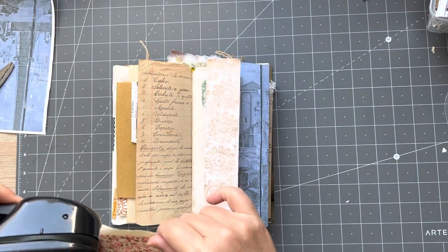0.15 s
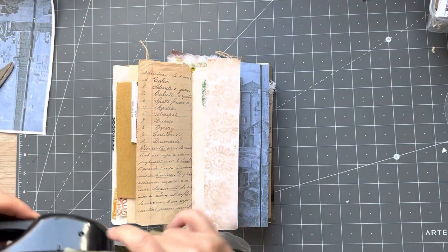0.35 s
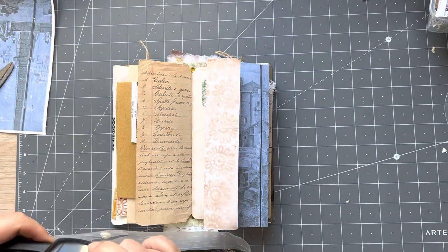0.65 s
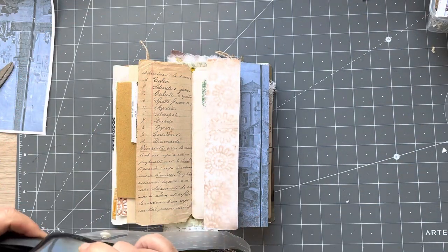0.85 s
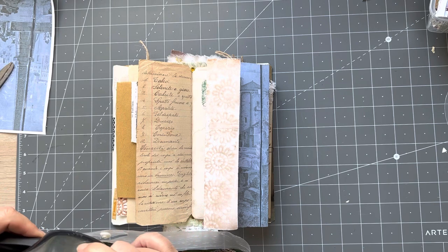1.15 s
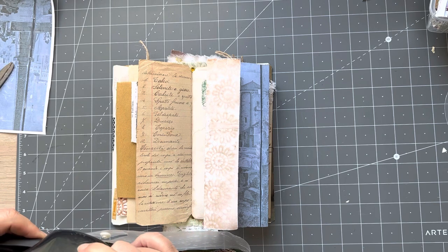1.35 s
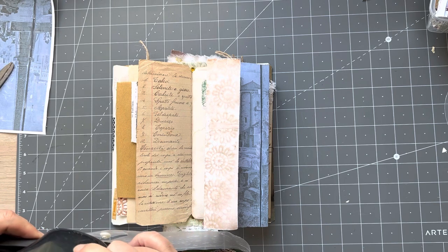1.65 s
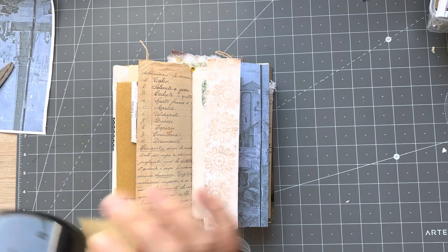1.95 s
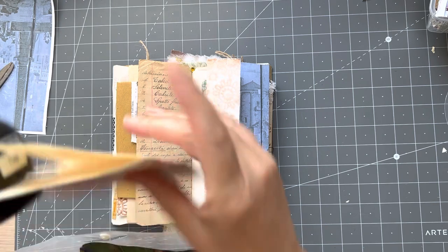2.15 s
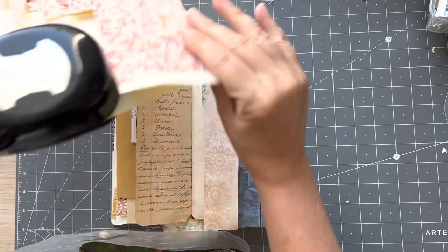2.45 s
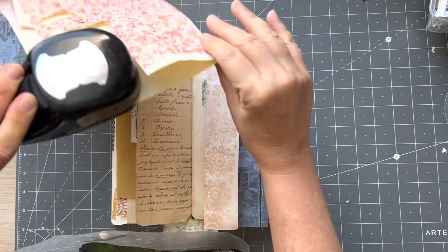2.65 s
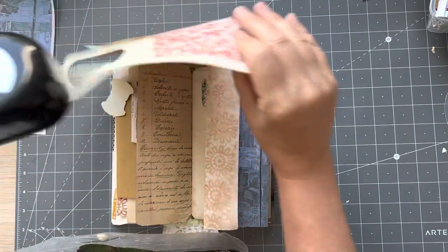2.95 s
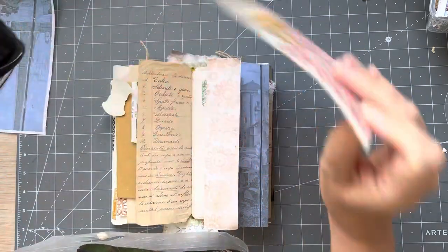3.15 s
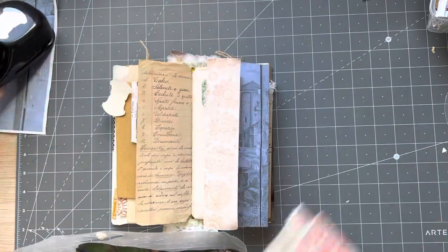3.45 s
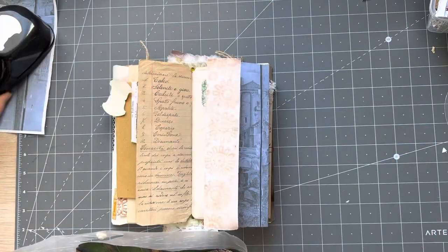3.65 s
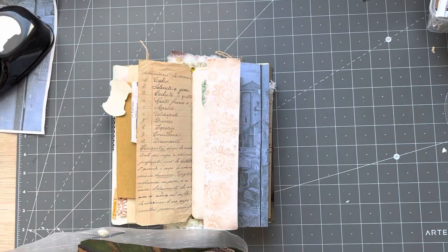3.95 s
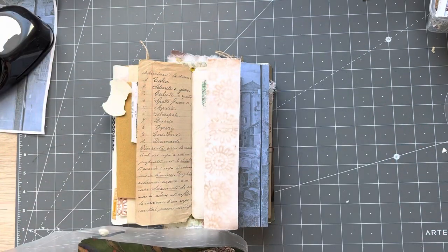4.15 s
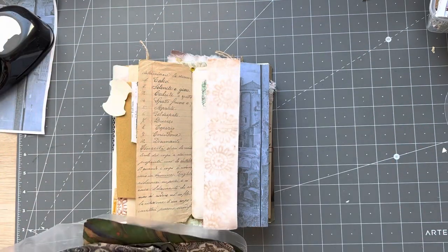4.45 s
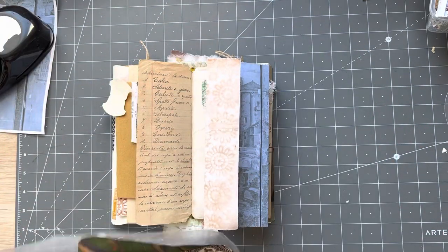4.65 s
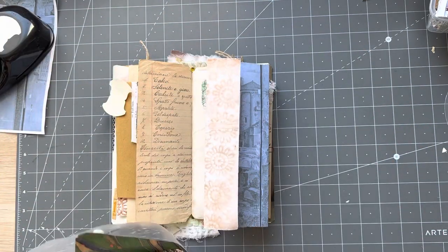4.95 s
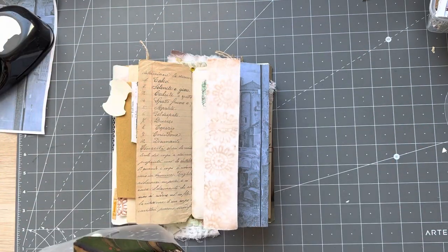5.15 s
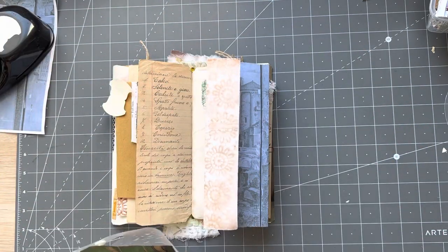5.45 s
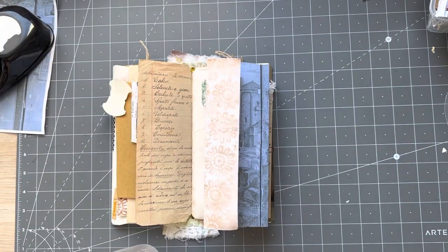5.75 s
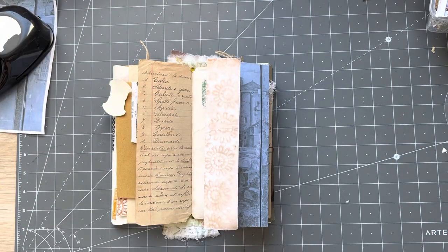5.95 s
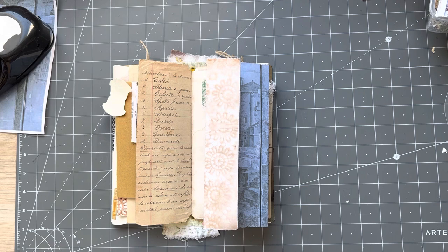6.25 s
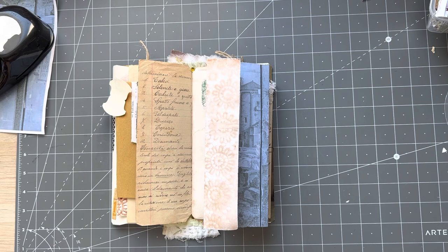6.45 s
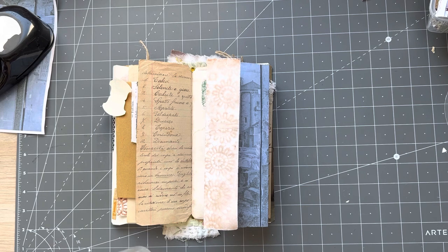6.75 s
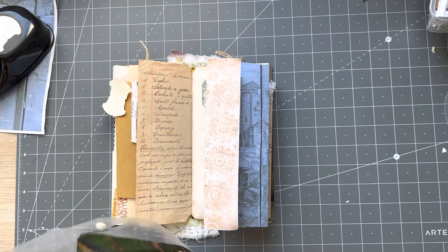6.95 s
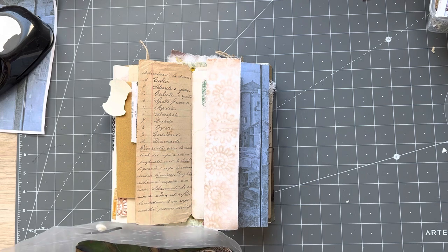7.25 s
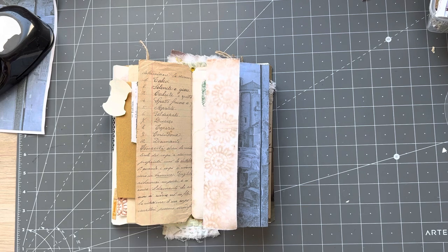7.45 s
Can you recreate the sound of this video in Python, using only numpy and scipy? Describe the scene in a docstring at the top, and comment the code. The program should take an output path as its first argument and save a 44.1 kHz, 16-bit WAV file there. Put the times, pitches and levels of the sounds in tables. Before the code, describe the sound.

Close stereo recording at a craft table in a small, fairly dry room. Paper slides softly with small snaps, then a lever punch bites card in a quick run of hard clicks. The sheet is pulled free with crisp cracks, the punch lands with a heavy low clunk and a few lighter knocks, and a hand rummages through rustling scraps, faintly bumping something hollow.

```python
"""Paper craft at a table in a small room, over a low rumble of filtered noise.
Card slides into a lever punch (coloured stick-slip noise); the die bites in jerks (bursts ringing its modes).
The sheet is pulled free with snaps (bursts of tiny cracks). Thin scraps begin to rustle; the punch is put
down with a heavy clunk and two knocks (struck modes plus rattle). A hand rummages on through the scraps,
bumping a small hollow container (short decaying notes); stiff card slides again at the end."""
import sys
import numpy as np
from scipy import signal
from scipy.fft import rfft, irfft, next_fast_len
from scipy.io import wavfile

SR = 44100
rng = np.random.default_rng(int(sys.argv[2]) if len(sys.argv) > 2 else 0)


def wrap_up_sound(samples):
    """Save the sound to the file named by the first command line argument, as 16-bit audio."""
    columns = np.atleast_2d(samples).T
    # keep every value between -1 and 1, then stretch to whole-number steps
    tamed = np.clip(columns, -1, 1)
    steps = np.round(tamed * 32767).astype(np.int16)
    wavfile.write(sys.argv[1], SR, steps)


N = 334719
TIME = np.arange(N) / SR

# Table levels are relative; each source adds its own trims.
# hand strokes on paper: [start t/s, length/s, rubbing hiss level/dB, sheet flutter level/dB]
STROKES = [(-0.05, 0.017, -41, -33.5), (.22, 0.28, -49, -53.5), (.42, 0.091, -68, -51.5),
           (.665, 0.073, -60.5, -57.5), (1.69, 0.14, -56, -60), (1.85, 0.14, -48, -59.5),
           (1.96, 0.039, -62, -50), (2.05, 0.02, -52, -44), (2.13, 0.37, -50, -57.5),
           (2.58, 0.11, -48, -54), (2.71, .1, -41.5, -49.5), (2.79, 0.087, -36, -48.5),
           (3.545, 0.029, -58.5, -75), (3.96, 0.14, -54.5, -63), (4.245, 0.041, -61, -56.5),
           (4.46, 0.33, -51.5, -66), (4.59, 0.13, -50, -44), (4.74, .15, -67.5, -52.5),
           (5.07, .21, -51.5, -48), (5.3, 0.069, -71, -56), (5.55, 0.097, -49.5, -72),
           (5.78, .15, -47.5, -44.5), (6.05, 0.1, -50.5, -49.5), (6.28, 0.12, -67, -51),
           (6.49, 0.06, -48.5, -59), (6.605, 0.1, -46.5, -50.5), (6.86, 0.14, -54, -47),
           (7.25, 0.14, -48, -41), (7.45, .14, -52, -60)]
# light brushing between strokes: [start t/s, length/s, hiss level/dB, flutter level/dB]
BRUSHES = [(.08, 0.78, -72, -66.5), (1.12, 0.14, -85.5, -74), (1.57, 2.4, -71, -71), (4.3, 2.68, -60, -63),
           (7.16, 0.46, -63.5, -61.5)]
# clear snaps of buckling paper: [t/s, level/dB, brightness/dB, nominal fade/s]
SNAPS = [(.572, -45, -39, 0.0097), (1.666, -31.5, 2, 0.0048), (1.715, -31, -2, 0.0065),
         (1.744, -28.5, 0.5, 0.0045), (2.146, -32, 8, .005), (2.096, -36, -39, 0.014),
         (2.236, -33, -39, 0.0077), (2.603, -28, 4.5, 0.0018), (2.708, -26.5, -5, 0.0058),
         (2.724, -27, -8, 0.0096), (2.809, -20.5, 0.5, 0.0055), (3.487, -37, -8, 0.009),
         (3.98, -39.5, 2.5, .01), (4.035, -29.5, 3.5, 0.0033), (4.044, -25.5, -15, 0.0097),
         (4.253, -44.5, 1, 0.0093), (4.591, -30, 3, 0.0043), (4.643, -28.5, -3.5, 0.0059),
         (5.085, -37, -7, .012), (5.158, -33.5, 0.5, 0.033), (5.227, -30, 3, 0.0026),
         (5.257, -20, -2, 0.0056), (5.564, -35.5, -23, 0.0041), (5.795, -32.5, -6, 0.019),
         (6.267, -29, -9.5, 0.0049), (6.492, -32.5, 9.5, 0.0024), (6.865, -35, -0.5, 0.0063),
         (7.462, -31.5, -4.5, 0.005), (7.515, -32.5, -16, 0.019), (7.546, -30, 3.5, .002)]
# card catching on the die: [t/s, level/dB, scrape re level/dB, nominal fade/s, strongest ring f/Hz]
CATCHES = [(2.314, -11.5, -14.5, 0.00062, 1900), (2.336, -20, -15.5, 0.0032, 1300),
           (2.3455, -28, -3, 0.002, 1500), (2.366, -14, -15.5, 0.0047, 1000),
           (2.398, -24, -4, 0.0068, 1000), (2.432, -11, -11, 0.0058, 1550)]
# punch meets table: [t/s, table thud level/dB, shell knock level/dB, rattle level/dB, struck part f/Hz]
KNOCKS = [(3.3809, -4, -16.5, -24, 740), (3.635, -33.5, -34, -46, 880), (3.6492, -26, -39, -25.5, 1700),
          (3.659, -18.5, -23.5, -37.5, 1500), (3.748, -26, -21, -32.5, 1366)]
# bumps on the hollow container: [t/s, level/dB, lowest mode f/Hz]
BUMPS = [(4.699, -34.5, 488), (4.9, -40.5, 420), (5.391, -38, 354), (5.527, -32.5, 432), (5.615, -22, 424),
         (5.934, -35, 456), (6.124, -37.5, 481), (6.387, -31.5, 432), (6.451, -36.5, 490)]

# modes of table top, punch shell, free die, free container: [f/Hz, level/dB, t60/s]
TABLE_MODES = [(81, -11, 0.17), (105.6, -30.5, .06), (115, -1, 0.13), (211, -8.5, 0.12),
               (263.4, -7.5, 0.13)]
SHELL_MODES = [(394, -19.5, 0.029), (621, 7.5, 0.019), (753, -0.5, 0.077), (842, 7, 0.016),
               (1030, -2, 0.051), (1250, 5.5, 0.012), (1510, 2, 0.01), (1820, -0.5, 0.018),
               (2150, 1, 0.016)]
DIE_MODES = [(990, 2, 0.015), (1083, 0.5, 0.014), (1537, -4.5, 0.053), (1650, -5, 0.013), (2230, -4, 0.014),
             (2330, -6, 0.031), (2710, -22, 0.027), (3930, -20, .015), (5440, -3, 0.009), (5590, -2, 0.013)]
CONTAINER_MODES = [(413, -3, 0.6), (488, -4, 0.068), (590, -25, 0.054), (836, -18, 0.05), (1387, -14, 0.34)]

# spectra of sliding card, sliding scraps, sheet flutter, snaps, lever rattle, room rumble: [f/Hz, level/dB]
CARD_HISS_SPECTRUM = [(500, -30), (950, -2), (1900, -0.5), (2700, -3.5), (5000, -1.5), (8500, -1.5),
                      (10500, -11.5), (12400, -0.5), (14000, -18.5), (16000, -4.5)]
SCRAP_HISS_SPECTRUM = [(500, -21), (1000, -9), (1900, -6.5), (3300, -0.5), (5000, -1), (8500, 2),
                       (10500, -10), (12400, 3.5), (14000, -8.5), (16000, -8.5)]
FLUTTER_SPECTRUM = [(60, -7), (130, 3.5), (300, -3), (600, -8), (950, -7.5), (1600, -3.5), (2400, -7.5),
                    (5000, -39.5)]
SNAP_SPECTRUM = [(100, -9.5), (300, -5.5), (900, 6.5), (1600, 6), (2300, 1.5), (3500, 3), (6000, -4),
                 (9000, -2.5), (16000, -11.5)]
RATTLE_SPECTRUM = [(200, 15.5), (800, 5), (2000, -1.5), (3500, -5.5), (6000, -12), (9000, -15),
                   (12500, -20.5), (16000, -37.5)]
RUMBLE_SPECTRUM = [(25, -36), (55, 2), (100, -11), (200, -14.5), (350, -25.5), (750, -41), (2000, -40),
                   (3500, -48.5), (12000, -54.5), (16000, -66.5)]

# level between the microphone ports: [f/Hz, left minus right/dB]
PORT_BALANCE = [(150, .2), (500, 2.4), (1500, 1.8), (2800, -1), (4000, -1), (5300, -4), (7200, -1.5),
                (9000, 0)]
# phase between the ports, opposite in two treble bands: [f/Hz, left lead/rad]
PORT_PHASE = [(100, 0), (1600, .3), (3200, -.6), (6600, -.5), (7700, -1.3), (9000, .2), (10000, 2.8),
              (10900, 3.4), (11700, 6.1), (12600, 6.5), (13300, 9.1), (14300, 9.6), (15100, 12.4)]

RUMMAGE_START_S, RUMMAGE_END_S = 3.1, 7.2  # thin scraps inside this span, stiff card outside
STROKE_ATTACK_S, STROKE_ATTACK_SHARE, STROKE_SAG_DB_PER_S = 0.017, 0.23, 10  # share of stroke length adds to attack
BRUSH_ATTACK_S = 0.13
HISS_RELEASE_DB_PER_S, FLUTTER_RELEASE_DB_PER_S = 201, 166
BODY_LOSS_PER_BRIGHTNESS = 0.083  # dB/dB; bright snaps come from small facets and carry less body
SMALL_SNAP_DB, SMALL_SNAP_SPREAD_DB = 11.5, 6.5  # re paper motion; +- spread
SMALL_SNAP_FADE_S = 0.0038
CARD_DAMPING_T60_S = 0.018  # added decay of die modes pressed by card
BUMP_T60_S = 0.093  # lowest container mode, damped by the hand
CUTOFF_HZ = 15900


def rubbing(crackle_db=-7.5, flutter_db=-3.5, crinkle_db=-4.0, hollow_db=-8.5, jostle_db=1.0, shake_db=-8.5,
            card_uneven_db=1.5, scrap_uneven_db=3.0, slip_uneven_db=4.5):
    """Sliding paper hisses and crinkles; stick-slip shakes the sheet and whatever it lies in."""
    hiss_level, flutter_level = stroke_levels()
    rummaging = (TIME > RUMMAGE_START_S) & (TIME < RUMMAGE_END_S)
    grip = drift(15)
    crackle = amp(crackle_db) * grains(per_s=780, spread_db=0.5)
    friction = (rng.standard_normal(N) + crackle) * hiss_level

    # stiff card glides evenly with a low voice; thin scraps snag and let go
    card = colour(friction * ~rummaging * amp(card_uneven_db * grip), CARD_HISS_SPECTRUM)
    scraps = colour(friction * rummaging * amp(scrap_uneven_db * grip), SCRAP_HISS_SPECTRUM)

    slips = grains(per_s=2200, spread_db=2.5) * amp(slip_uneven_db * grip)
    flutter = colour(slips * flutter_level * amp(flutter_db), FLUTTER_SPECTRUM)
    ticks = crinkles(per_s=260, low_hz=846, high_hz=3600, cycles=6.1)
    ticks = ticks * np.sqrt(hiss_level * flutter_level) * amp(crinkle_db)

    # rummaging jostles larger pieces and stirs container and table
    jostle = crinkles(per_s=150, low_hz=369, high_hz=1150, cycles=11.3)
    nudges = grains(per_s=140, spread_db=1.0)
    # the hand halves the ring
    hollow = rms_one(sum(amp(db) * ring(nudges, hz, t60 / 2) for hz, db, t60 in CONTAINER_MODES))
    shake = rms_one(band(slips, [50, 120], "band"))
    stirred = amp(jostle_db) * jostle + amp(hollow_db) * hollow + amp(shake_db) * shake
    return card + scraps + flutter + ticks + stirred * (TIME > RUMMAGE_START_S) * flutter_level


def stroke_levels():
    """Hiss and flutter gains of moving paper; overlapping movements add in power."""
    hiss_power, flutter_power = 0, 0
    for moves, attack_s, share, sag in (
            (STROKES, STROKE_ATTACK_S, STROKE_ATTACK_SHARE, STROKE_SAG_DB_PER_S),
            (BRUSHES, BRUSH_ATTACK_S, 0, 0)):
        for start_s, length_s, hiss_db, flutter_db in moves:
            shape = start_s, length_s, attack_s + share * length_s, sag
            hiss_power += (amp(hiss_db) * swell(*shape, HISS_RELEASE_DB_PER_S)) ** 2
            flutter_power += (amp(flutter_db) * swell(*shape, FLUTTER_RELEASE_DB_PER_S)) ** 2
    return [np.interp(TIME, TIME[::32], np.sqrt(power)) for power in (hiss_power, flutter_power)]


def swell(start_s, length_s, attack_s, sag_db_per_s, release_db_per_s):
    """Gain of one movement, every 32nd sample: eased attack, sagging hold, release."""
    age_s = np.maximum(TIME[::32] - start_s, 0)
    attack = np.sin(np.pi / 2 * np.minimum(age_s / attack_s, 1)) ** 2
    return attack * amp(-sag_db_per_s * age_s - release_db_per_s * np.maximum(age_s - length_s, 0))


def crinkles(per_s, low_hz, high_hz, cycles, tilt_db_per_octave=-1.0, count=10):
    """Small paper facets flip over; each flip ticks with its own mix of pitches; rms 1."""
    flips = grains(per_s, spread_db=5.5)
    total = 0
    for hz in np.geomspace(low_hz, high_hz, count):
        ticks = rms_one(ring(flips * rng.standard_normal(N), hz, cycles / hz))
        total = total + ticks * amp(tilt_db_per_octave * np.log2(hz / low_hz))
    return rms_one(total)


def snaps(body_db=-7.0, middle_db=-5.0, upper_db=-16.0, crisp_db=-7.5, rise_s=0.00088, upper_share=0.42,
          middle_hz=(750, 2300), crisp_hz=6000):
    """A buckling sheet lets go in an avalanche of tiny cracks; brightness lifts the upper bands."""
    t, level_db, bright_db, fade_s = np.vstack([SNAPS, small_snaps()]).T
    cracks = colour(grains(per_s=15000, spread_db=4.0), SNAP_SPECTRUM)
    fine_cracks = grains(per_s=12000, spread_db=2.0)

    low_db = level_db + body_db - BODY_LOSS_PER_BRIGHTNESS * bright_db
    low = rms_one(band(cracks, middle_hz[0], "low")) * bursts(t, low_db, fade_s * 1.25, rise_s * 2)
    middle = rms_one(band(cracks, middle_hz, "band"))
    middle = middle * bursts(t, level_db + middle_db, fade_s * 0.84, rise_s)
    upper = rms_one(band(fine_cracks, [middle_hz[1], crisp_hz], "band"))
    upper = upper * bursts(t, level_db + upper_share * bright_db + upper_db, fade_s, rise_s)
    high = rms_one(band(cracks, crisp_hz, "high"))
    high = high * bursts(t, level_db + bright_db + crisp_db, fade_s * 0.57, rise_s / 2)
    return low + middle + upper + high


def small_snaps(count=26):
    """Scraps buckle at random while rummaging, louder under a firmer stroke; rows as in SNAPS."""
    firmness = np.sqrt(np.prod(stroke_levels(), axis=0))
    when, size, bright = rng.random((count, 3)).T
    # one per equal slot
    t = np.interp(np.arange(count) + when, [0, count], [RUMMAGE_START_S, RUMMAGE_END_S])
    level_db = 20 * np.log10(np.interp(t, TIME, firmness) + 1e-9) + SMALL_SNAP_DB
    level_db = level_db + SMALL_SNAP_SPREAD_DB * (2 * size - 1)
    bright_db = SMALL_SNAP_SPREAD_DB * (2 * bright - 1)
    return np.column_stack([t, level_db, bright_db, np.full(count, SMALL_SNAP_FADE_S)])


def catches(ring_db=-4.0, scrape_db=1.5, rise_s=0.00071, off_pitch_db_per_octave=-5.0):
    """Card yields under the die in jerks; each scrapes and rings the modes nearest its contact point."""
    t, level_db, crisp_db, fade_s, ring_hz = np.transpose(CATCHES)
    jerks = grains(per_s=14000, spread_db=4.0)
    body = np.zeros(N)
    for k, (hz, db, free_t60) in enumerate(DIE_MODES):
        t60 = 1 / (1 / free_t60 + 1 / CARD_DAMPING_T60_S)
        off_db = off_pitch_db_per_octave * np.abs(np.log2(hz / ring_hz))
        push = jerks * bursts(t, level_db + ring_db + off_db, fade_s, rise_s)
        # a longer ring spreads the same energy over more time
        energy_gain = np.sqrt(4 * np.log(1000) / (t60 * SR))
        body += amp(db) * ring(push, hz, t60) * energy_gain * (-1) ** k  # alternate polarity
    scrape = colour(jerks * bursts(t, level_db + crisp_db + scrape_db, fade_s, rise_s), SNAP_SPECTRUM)
    return body + scrape


def punch_put_down(lag_s=0.0064, swell_hz=(60, 170), rattle_fade_s=0.024, off_pitch_db_per_octave=-12.0,
                   contact_hz=2500):
    """Shell knocks and lever rattles at once; the table's slow bending waves follow, lowest last."""
    t, thud_db, shell_db, rattle_db, part_hz = np.transpose(KNOCKS)
    thud = 0
    for hz, db, t60 in TABLE_MODES:
        arrival_s = t + lag_s * np.sqrt(100 / hz)
        thud = thud + ring(strikes(arrival_s, thud_db + db), hz, t60)
    shell = 0
    for k, (hz, db, t60) in enumerate(SHELL_MODES):
        # modes near the pitch of the struck part answer most
        off_db = off_pitch_db_per_octave * np.abs(np.log2(hz / part_hz))
        shell = shell + ring(strikes(t, shell_db + db + off_db), hz, t60) * (-1) ** k
    chatter = grains(per_s=8200, spread_db=4.0) * bursts(t, rattle_db, rattle_fade_s, rise_s=0.00029)
    rattle = colour(chatter, RATTLE_SPECTRUM)
    return amp(3.5) * band(thud, swell_hz, "band"), band(shell, contact_hz, "low") + rattle


def bumps(soft_hz=1100, scuff_db=-18.5, scuff_fade_s=0.0084):
    """Soft contacts scuff the container and sound a short hollow note; its high modes die first."""
    notes, age_s = np.zeros(N), TIME[:SR // 4]
    lowest_hz = CONTAINER_MODES[0][0]
    for t, level_db, pitch_hz in BUMPS:
        start = round(t * SR)
        note = 0
        for hz, db, _ in CONTAINER_MODES:
            ratio = hz / lowest_hz
            fade = np.exp(-np.log(1000) * age_s / BUMP_T60_S * ratio)
            note = note + amp(db) * np.sin(2 * np.pi * pitch_hz * ratio * age_s) * fade
        notes[start:start + len(age_s)] += (amp(level_db) * note)[:N - start]
    t, level_db, _ = np.transpose(BUMPS)
    scuff = colour(grains(per_s=4300, spread_db=0.0), FLUTTER_SPECTRUM)
    scuff = scuff * bursts(t, level_db + scuff_db, scuff_fade_s, rise_s=0.00043)
    return band(notes, soft_hz, "low") + scuff


def room(x, near_db=-11.5, near_t60=0.034, walls_db=-8.5, walls_t60=0.17, first_s=0.0017, wide_db=-2.0,
         alike_above_hz=11000, mount_db=-8.0, mount_hz=(3000, 6000), mount_s=0.0033, moves_hz=3.0, count=5):
    """Quick table-top scatter, then a faint wall tail; the echo pattern shifts as the hands move."""
    age_s = TIME[:SR // 3]
    decay = 0
    for level_db, t60 in ((near_db, near_t60), (walls_db, walls_t60)):
        fade = np.exp(-np.log(1000) * age_s / t60) * (age_s > first_s)
        decay = np.hypot(decay, amp(level_db) * fade / np.linalg.norm(fade))
    nearness = np.array([drift(moves_hz) for _ in range(count)])
    out = 0
    for share in nearness / np.linalg.norm(nearness, axis=0):
        mid, side, early = rng.standard_normal((3, len(age_s)))
        mid = mid * decay
        # top treble reaches both ports alike
        side = amp(wide_db) * band(side * decay, alike_above_hz, "low")
        # very short upper-middle echoes differ from port to port
        mount = band(early * (age_s < mount_s), mount_hz, "band")
        mount = mount / np.linalg.norm(mount) * np.sqrt(2 * np.ptp(mount_hz) / SR)
        side = side + amp(mount_db) * mount
        echoes = np.array([mid + side, mid - side])
        out = out + signal.oaconvolve((share * x)[None], echoes, axes=1)[:, :N]
    return out


def boom(thud, t60=2.3, boom_db=-43.0, low_hz=60, high_hz=128):
    """The room's crowded bass modes linger and beat after a thud; response cut at 1 s."""
    age_s = TIME[:SR]
    modes = band(rng.standard_normal(SR), [low_hz, high_hz], "band") * np.exp(-np.log(1000) * age_s / t60)
    return amp(boom_db) * signal.oaconvolve(thud, modes / np.linalg.norm(modes))[:N]


def rumble():
    """Steady noise, strongest in the bass."""
    return amp(-61.5) * colour(rng.standard_normal(N), RUMBLE_SPECTRUM)


def grains(per_s, spread_db):
    """Fibres slipping: random clicks, mostly small and a few large; rms 1."""
    sizes = amp(spread_db * np.minimum(rng.exponential(1, N), 3)) * rng.choice([-1, 1], N)
    return rms_one(sizes * (rng.random(N) < per_s / SR))


def bursts(times_s, level_db, fade_s, rise_s, strain_db=-17.0, strain_s=0.0064):
    """Envelope of sudden releases: faint build-up of strain, quick swell, exponential fade."""
    power, lead = np.zeros(N), SR // 50
    age_s = TIME[:SR // 4] - TIME[lead]
    after_s = np.maximum(age_s, 0)
    for t, db, fade in zip(times_s, level_db, np.broadcast_to(fade_s, len(times_s))):
        start = max(round(t * SR) - lead, 0)
        shape = (1 - np.exp(-after_s / rise_s)) * np.exp(-after_s / max(fade, 1e-3))  # fade at least 1 ms
        shape = shape / shape.max() + amp(strain_db) * np.exp(-np.abs(age_s) / strain_s)
        power[start:start + len(age_s)] += (amp(db) * shape)[:N - start] ** 2
    return np.sqrt(power)


def strikes(times_s, level_db):
    """One click per contact."""
    clicks = np.zeros(N)
    clicks[np.clip(np.round(times_s * SR).astype(int), 0, N - 1)] = amp(level_db)
    return clicks


def ring(clicks, hz, t60):
    """Two-pole resonator: a unit click starts a decaying sine of height 1."""
    r, w = 10 ** (-3 / (t60 * SR)), 2 * np.pi * hz / SR
    return signal.lfilter([0, np.sin(w)], [1, -2 * r * np.cos(w), r * r], clicks + 1e-18)


def drift(rate_hz):
    """Slow random wander with spread 1, made at SR/40 after a settling run."""
    r = np.exp(-80 * np.pi * rate_hz / SR)
    noise = rng.standard_normal(N // 40 + 2002)
    slow = signal.lfilter([1], [1, -2 * r, r * r], noise)[2000:]
    return np.interp(np.arange(N) / 40, np.arange(len(slow)), rms_one(slow))


def colour(x, spectrum, size=4096):
    """Causal (minimum-phase) filter of the given spectrum; white noise keeps its level."""
    cepstrum = irfft(np.log(amp(at_hz(spectrum, np.fft.rfftfreq(size, 1 / SR)))))
    cepstrum[1:size // 2] *= 2
    cepstrum[size // 2 + 1:] = 0
    response = irfft(np.exp(rfft(cepstrum)))
    return signal.oaconvolve(x, response / np.linalg.norm(response))[:N]


def band(x, edge_hz, kind):
    """Butterworth filter, design order 2."""
    return signal.sosfilt(signal.butter(2, edge_hz, kind, fs=SR, output="sos"), x + 1e-18)


def at_hz(points, hz):
    """Read a table on a log-frequency axis."""
    known_hz, values = np.transpose(points)
    return np.interp(np.log(np.maximum(hz, 1)), np.log(known_hz), values)


def amp(db):
    """Decibels to gain."""
    return 10 ** (np.asarray(db) / 20)


def rms_one(x):
    """Scale to rms 1."""
    return x / np.sqrt(np.mean(x ** 2) + 1e-20)


def scene(table_radiates_above_hz=60, punch_room_db=1.5):
    """Paper, punch and container in the room, over a rumble; the punch is put down further off."""
    near = rubbing() + snaps() + catches() + bumps()
    thud, clatter = punch_put_down()
    thud = band(thud, table_radiates_above_hz, "high")
    echoes = room(near + amp(punch_room_db) * clatter)
    return near + clatter + echoes + thud + boom(thud) + rumble()


def ports(x):
    """Sound reaches the two ports with different level and phase."""
    size = next_fast_len(N + SR // 10)
    hz = np.fft.rfftfreq(size, 1 / SR)
    # half the difference on each side
    half = amp(at_hz(PORT_BALANCE, hz) / 2) * np.exp(.5j * at_hz(PORT_PHASE, hz))
    return irfft(rfft(x, size) * np.array([half, 1 / half]), size)[:, :N]


def record(dry):
    """Two microphone ports; steep elliptic low-pass cuts the top."""
    lowpass = signal.ellip(10, .2, 80, CUTOFF_HZ, fs=SR, output="sos")
    return signal.sosfilt(lowpass, ports(dry))


dry = scene()
out = record(dry)
wrap_up_sound(out)
```